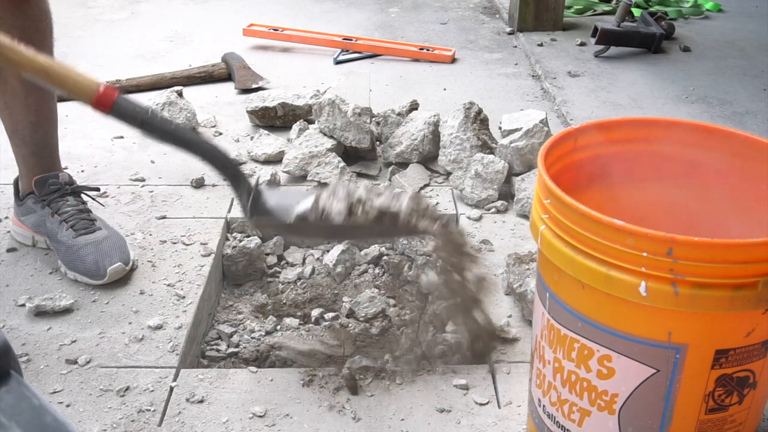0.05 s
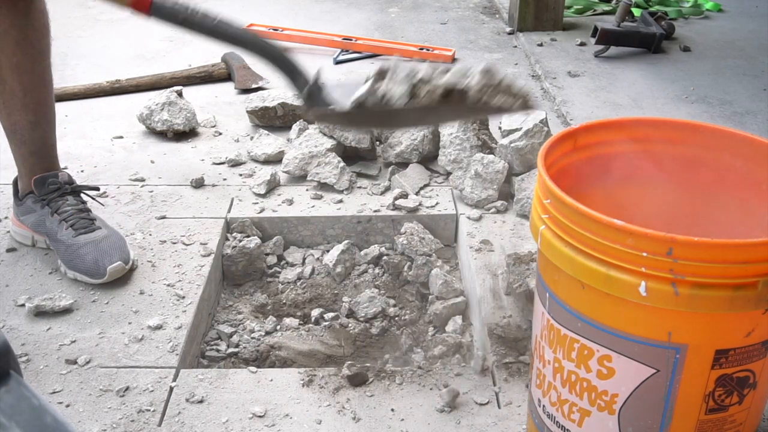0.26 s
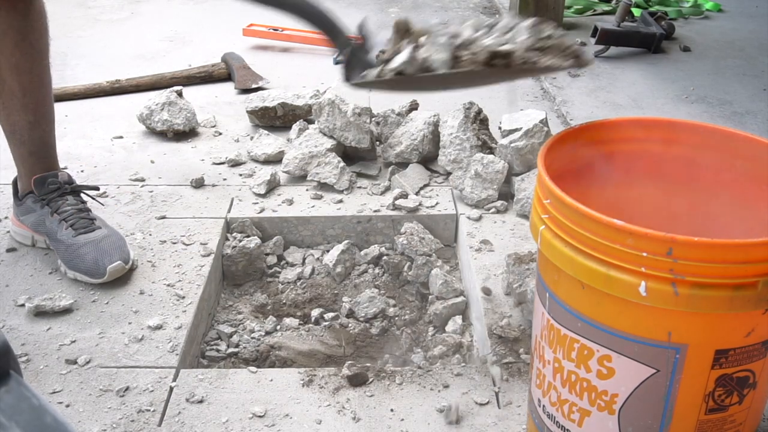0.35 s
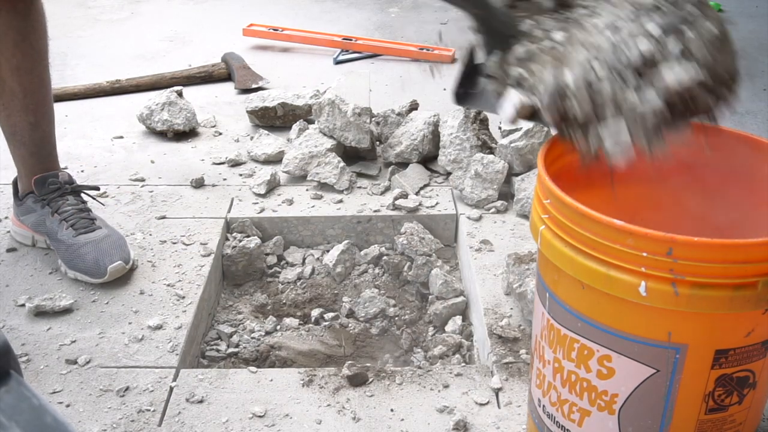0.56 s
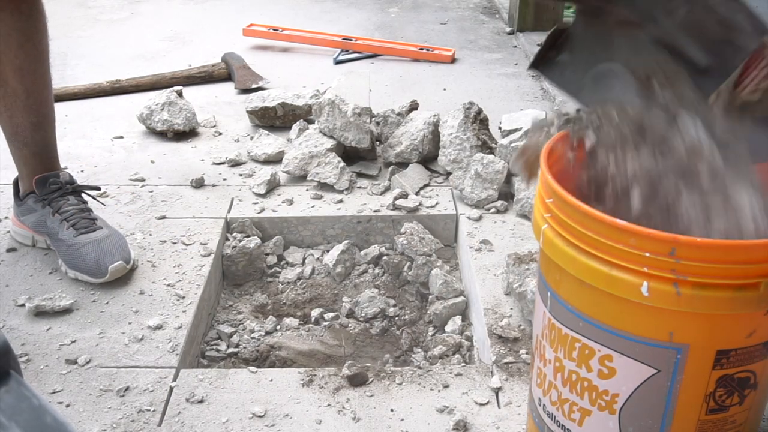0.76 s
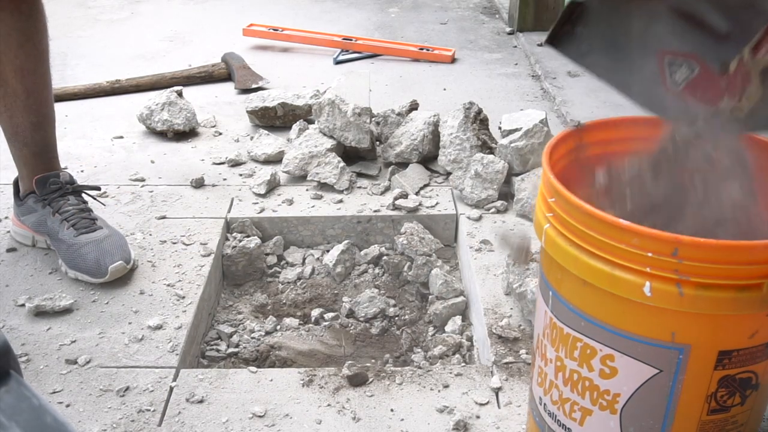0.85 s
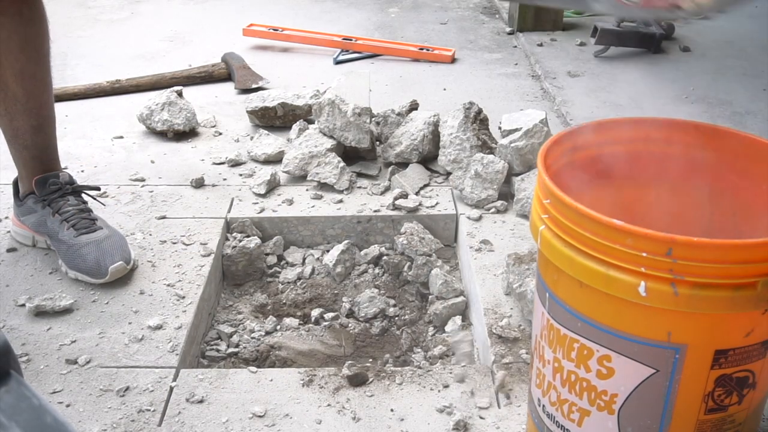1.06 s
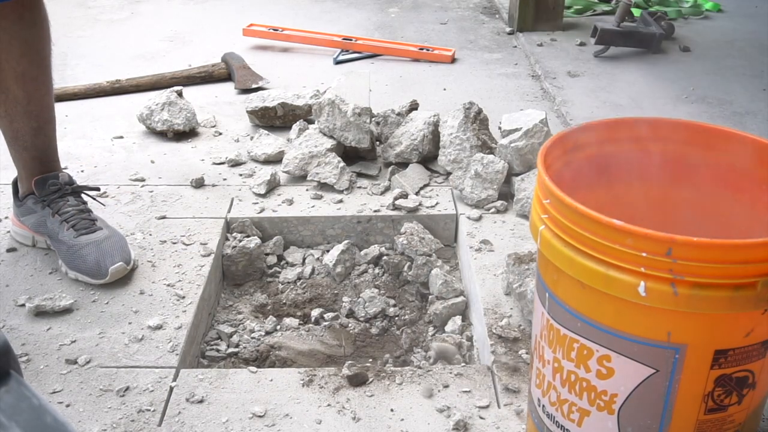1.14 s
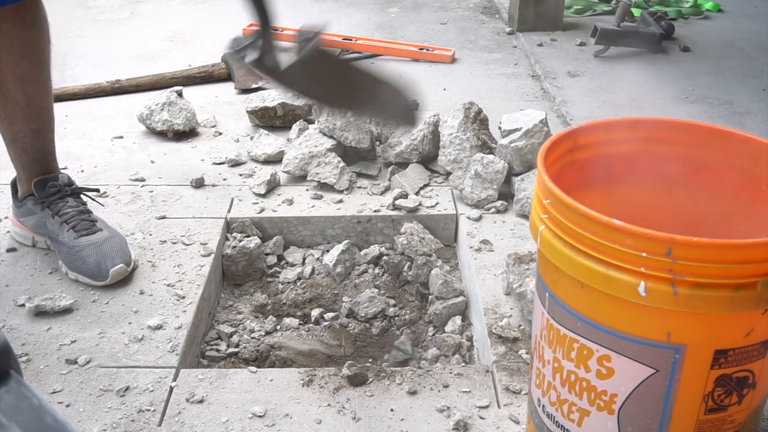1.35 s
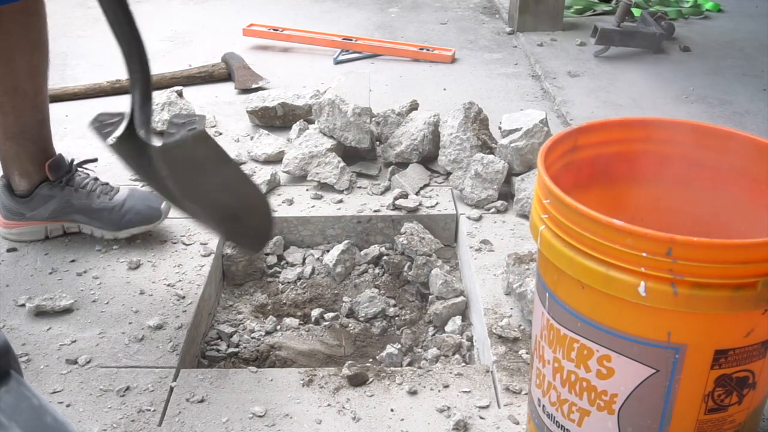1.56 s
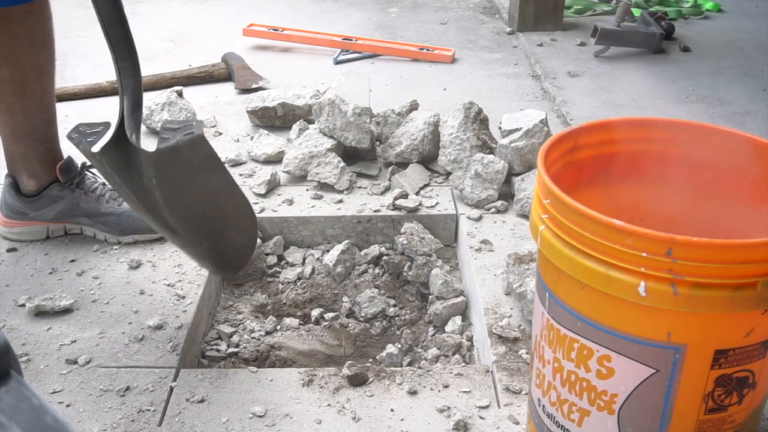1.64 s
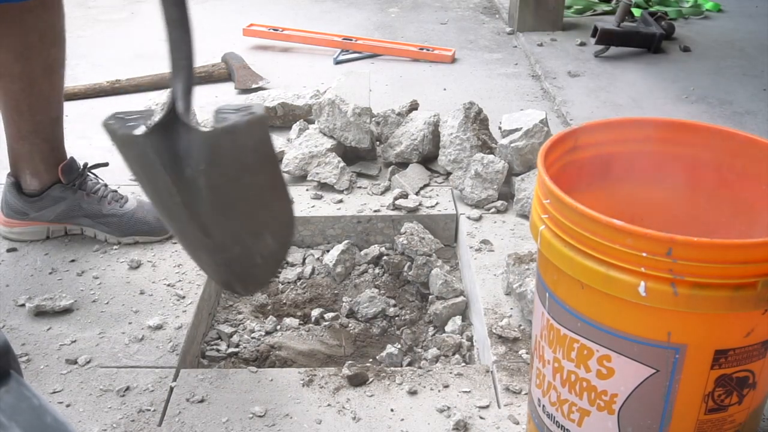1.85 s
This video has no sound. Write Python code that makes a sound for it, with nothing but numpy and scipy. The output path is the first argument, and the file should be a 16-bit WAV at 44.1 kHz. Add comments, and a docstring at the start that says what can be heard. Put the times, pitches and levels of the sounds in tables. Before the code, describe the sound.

Broken concrete is shovelled into a plastic bucket, close by outdoors. Crumbs patter on paving, then lumps thump the bucket floor as gravel rattles off the ringing steel blade. A few stragglers drop and a shoe scuffs over grit.

```python
"""Rubble shovelled into a bucket.

A shovelful of broken concrete is lifted, spilling crumbs on the paving, and tipped into a plastic
bucket. Big lumps thump its floor, gravel and grit pour off the ringing steel blade, and a few
stragglers drop. Then a shoe scuffs over the gritty slabs. A faint low hum lies under the outdoor air."""
import sys
import numpy as np
from scipy import signal
from scipy.fft import rfft, irfft
from scipy.io import wavfile
from scipy.ndimage import uniform_filter1d

SR = 44100
rng = np.random.default_rng(int(sys.argv[2]) if len(sys.argv) > 2 else 0)


def master_out(mix):
    """Clip the mix to full scale and print it as 16-bit PCM to the path in sys.argv[1]."""
    frames = np.transpose(np.atleast_2d(mix))
    ceiling = np.clip(frames, -1, 1)
    pcm = np.round(ceiling * 32767).astype(np.int16)
    wavfile.write(sys.argv[1], SR, pcm)


N = 83790  # 1.9 s


def from_db(db):
    """Decibels to gain."""
    return 10 ** (np.asarray(db) / 20)


def unit_rms(x):
    """Scale to unit power."""
    return x / np.sqrt(np.mean(x ** 2) + 1e-20)


def envelope(points):
    """Gain over time through (t/s, level/dB) points."""
    t_s, db = np.transpose(points)
    return from_db(np.interp(np.arange(N) / SR, t_s, db))


def at_level(x, db, window_s=0.01):
    """Give a short sound the energy of that level held for window_s."""
    return from_db(db) * x * np.sqrt(window_s * SR / np.sum(x ** 2))


def add(out, t_s, x):
    """Mix x in at t_s."""
    start = int(t_s * SR)
    out[start:start + len(x)] += x[:N - start]


def coloured(x, points, size=2048):
    """Minimum-phase filter of unit power, shaped by (f/Hz, level/dB) points."""
    hz, db = np.transpose(points)
    grid_hz = np.maximum(np.arange(size // 2 + 1) * SR / size, 1)
    magnitude = from_db(np.interp(np.log(grid_hz), np.log(hz), db))
    cepstrum = irfft(np.log(magnitude))
    cepstrum[1:size // 2] *= 2
    cepstrum[size // 2 + 1:] = 0
    response = irfft(np.exp(rfft(cepstrum)))
    return signal.fftconvolve(x, response / np.linalg.norm(response))[:len(x)]


def resonance(x, hz, width_hz):
    """Band-pass, unit gain at its centre."""
    r = np.exp(-np.pi * width_hz / SR)
    feedback = [1, -2 * r * np.cos(2 * np.pi * hz / SR), r * r]
    return signal.lfilter(np.array([1, 0, -1]) * (1 - r * r) / 2, feedback, x + 1e-18)


def high_pass(x, hz):
    """Second-order low cut."""
    return signal.sosfilt(signal.butter(2, hz, "high", fs=SR, output="sos"), x)


def contact(t60_s, size=4096):
    """A stone's touch: a spike and a dense, quickly dying ring."""
    evenness = 0.44  # 0 = ragged spectrum, 1 = flat
    decay = from_db(-60 * np.arange(size) / SR / t60_s)
    burst = rng.standard_normal(size) * decay
    burst[0] = 3.6  # spike
    spectrum = rfft(burst)
    return irfft(spectrum / (np.abs(spectrum) + 1e-9) ** evenness) * decay ** 0.25


def grains(rate_hz, spread_db, t60_s, pitched, sizes=16):
    """Random fragment collisions at a steady unit level; each fragment size favours its own pitch."""
    hits = rng.random(N) < rate_hz / SR
    strength = from_db(spread_db * np.minimum(rng.exponential(1, N), 4))
    clicks = hits * strength * rng.choice([-1, 1], N)
    size_class = rng.integers(0, sizes, N)
    out = np.zeros(N)
    for k, hz in enumerate(np.geomspace(500, 12000, sizes)):
        touch = contact(t60_s)
        grain = touch + pitched * resonance(touch, hz, hz / 3)
        out += signal.fftconvolve(clicks * (size_class == k), grain)[:N]
    return out / np.sqrt(uniform_filter1d(out ** 2, size=1800) + 1e-9)


def stones():
    """Each landing stone gives a knock and a brief ring pitched by its size, and a bright crack."""
    # landings: t/s, knock level/dB, knock f/Hz, knock width/oct, crack level/dB, t60/s
    landings = [(0.0259, -31.5, 2840, 1.5, -25.5, 0.012), (0.0605, -37, 2570, 1.7, -26.5, 0.033),
                (.1079, -55, 2500, 2.3, -36, 0.0081), (0.1536, -55, 3040, 1.5, -35, 0.0055),
                (0.2165, -12, 1420, 0.12, -42, 0.039), (0.2175, -14.5, 802, 0.38, -28.5, 0.029),
                (0.2206, -24, 2800, 0.21, -37, 0.007), (0.2392, -38, 2680, 1.1, -24.5, 0.034),
                (.2580, -30, 2280, 1.6, -35, 0.011), (0.31, -36, 1800, 1.8, -41, 0.018),
                (0.3252, -26.5, 3130, 1.2, -27.5, 0.029), (0.3335, -29.5, 970, 1.1, -29.5, 0.043),
                (0.3466, -21, 1133, 0.72, -55, 0.041), (0.4535, -21, 1667, 0.39, -34, 0.052),
                (0.4868, -22.5, 1420, 0.2, -18, 0.044), (0.4867, -23, 2660, 0.15, -21, 0.082),
                (.5405, -39.5, 2840, 2.3, -34, 0.0056), (0.603, -70, 2960, 1.5, -30, 0.012),
                (0.6174, -46, 1660, 0.69, -30, 0.039), (0.6489, -13, 1328, 1.87, -22.5, 0.063),
                (0.6714, -16.5, 1597, 0.5, -49, 0.053), (.6780, -10.5, 577, 0.44, -34, 0.052),
                (.7224, -8.5, 714, 0.49, -22.5, 0.029), (0.7231, -13.5, 1645, 1.5, -44, 0.052),
                (0.7546, -16.5, 1600, 1.9, -28, 0.024), (0.7661, -14, 1335, 0.56, -18.5, 0.071),
                (0.7788, -10.5, 694, 1.7, -22, 0.044), (0.794, -10, 2000, 1.7, -16, 0.091),
                (0.8064, -14, 2180, 0.77, -36, 0.012), (0.8733, -13, 734, 0.18, -24, 0.067),
                (0.9132, -15, 1340, 0.51, -23, .02), (.9250, -9, 1466, 0.87, -23, 0.075),
                (0.9552, -16, 1690, 2.9, -16, 0.037), (.9740, -17, 1320, 0.32, -22, 0.014),
                (1.0281, -10.5, 1220, 0.37, -21.5, 0.038), (1.0533, -10, 915, 1.07, -26, 0.069),
                (1.063, -13, 1430, 0.21, -23.5, 0.0067), (1.0736, -15, 1022, 0.7, -33, 0.08),
                (1.0930, -19.5, 804, 0.31, -44, 0.026), (1.17, -21, 1340, 3, -47, 0.053),
                (1.1775, -11.5, 1256, .8, -25, 0.037), (1.1937, -48, 1300, 1.0, -24, 0.011),
                (1.2334, -24, 2060, 0.84, -42, 0.046), (1.2423, -20, 2220, 1.2, -45, 0.022),
                (1.2510, -30, 2260, 2.2, -29.5, 0.025), (1.2886, -27, 1380, 0.52, -57, 0.025),
                (1.2889, -31, 3380, 0.54, -61, 0.016), (1.3416, -19, 690, 0.18, -72, 0.014),
                (1.3435, -25.5, 1773, 0.56, -63, 0.033), (1.447, -41, 1720, 1.9, -39, 0.017),
                (1.503, -22.5, 1950, 0.76, -50, 0.011), (1.5116, -23, 2340, 0.35, -68, 0.018),
                (1.5366, -17, 1700, 0.44, -36, 0.018), (1.5820, -53, 2500, 1.2, -20, 0.012),
                (1.6105, -30, 1800, 0.83, -28.5, 0.014), (1.6392, -28, 2040, 1.1, -37, 0.016),
                (1.794, -44, 1340, 0.43, -77, 0.028), (1.873, -45, 2150, 1.6, -63, .02)]
    crack_colour = [(100, -46), (400, 2), (1500, 0), (4000, 2.5), (6000, -0.5), (8400, 5), (9400, 1.5),
                    (10500, -14.5), (14000, -12.5), (16000, -14)]  # crack spectrum: f/Hz, level/dB
    knock_trim_db, crack_trim_db = -2, -4
    skirt_oct, rise_db_per_oct, fall_db_per_oct = 4, 16, 21.5
    out = np.zeros(N)
    for t_s, knock_db, hz, width_oct, crack_db, t60_s in landings:
        low_hz, high_hz = hz / 2 ** (width_oct / 2), hz * 2 ** (width_oct / 2)
        band = [(low_hz / 2 ** skirt_oct, -skirt_oct * rise_db_per_oct), (low_hz, 0),
                (high_hz, 0), (high_hz * 2 ** skirt_oct, -skirt_oct * fall_db_per_oct)]
        knock = at_level(coloured(contact(t60_s), band), db=0)
        ring = at_level(stone_ring(hz, 1.26 * t60_s), db=-6.5)
        body = high_pass(knock + ring, 0.65 * low_hz)
        crack = coloured(contact(0.99 * t60_s), crack_colour)
        add(out, t_s, at_level(body, knock_db + knock_trim_db))
        add(out, t_s, at_level(crack, crack_db + crack_trim_db))
    return out


def stone_ring(hz, t60_s, size=4096):
    """A few heavily damped modes, slightly detuned in every fragment."""
    modes = [(0.602, -9), (0.998, -2.5), (1.289, -9.5), (2.08, -10.5)]  # stone modes: ratio to knock pitch, level/dB
    t = np.arange(size) / SR
    tones = sum(from_db(db) * np.sin(2 * np.pi * hz * ratio * rng.normal(1, 0.018) * t)
                for ratio, db in modes)
    return tones * from_db(-60 * t / t60_s)


def thumps():
    """Heavy lumps push on the bucket's floor with a soft pulse."""
    lumps = [(0.6512, -5.5, 400), (.6740, -26, 900), (.6840, -18.5, 1010), (0.7233, -16, 1010),
             (0.9925, -22.5, 704)]  # impacts: t/s, level/dB, contact cut-off f/Hz
    t = np.arange(N // 50) / SR
    force = np.zeros(N)
    for t_s, db, cutoff_hz in lumps:
        push = t * np.exp(-2 * np.pi * cutoff_hz * t)
        add(force, t_s, from_db(db) * push / push.sum())
    return bucket(force)


def bucket(force):
    """A force drives the bucket's modes; its wall radiates as it moves."""
    modes = [(60, -23, 0.14), (115, -15, 0.072), (202, -0.5, 0.077), (215.6, 0, 0.078), (426, -1.5, .12),
             (550, -38, 0.076), (647, -22, 0.097), (850, 8.5, 0.07), (1290, -22, .04), (1500, -4, 0.054)]  # floor and wall modes: f/Hz, level/dB, t60/s
    max_cycles = 80
    out = np.zeros(N)
    for hz, db, t60_s in modes:
        ring_s = min(t60_s, max_cycles / hz)
        r = from_db(-60 / (ring_s * SR))
        feedback = [1, -2 * r * np.cos(2 * np.pi * hz / SR), r * r]
        out += from_db(db) * signal.lfilter([0.5, 0, -0.5], feedback, force + 1e-18)
    return out


def pour():
    """Gravel and grit clatter off the blade and drum on the plastic, cushioned by the heap."""
    # gravel flow, grit flow, drumming on the floor: t/s, level/dB
    gravel_flow = [(.6, -47), (.625, -34.5), (.66, -21.5), (.69, -23), (.71, -21.5), (.748, -28),
                   (.775, -14), (.81, -15.5), (.89, -15.5), (.94, -17.5), (1.01, -14), (1.05, -20),
                   (1.09, -19.5), (1.11, -32), (1.155, -28.5), (1.19, -33), (1.23, -34.5), (1.31, -48),
                   (1.43, -48), (1.46, -77)]
    grit_flow = [(.6, -60), (.625, -38), (.68, -27.5), (.745, -28.5), (.79, -22.5), (.86, -20.5),
                 (.895, -24.5), (.96, -22.5), (1.02, -27), (1.09, -51), (1.12, -45), (1.2, -42),
                 (1.26, -58), (1.32, -65), (1.43, -50), (1.46, -86)]
    drumming = [(.64, -75), (.69, -50), (.78, -30), (.835, -23), (.9, -28.5), (.95, -35), (.99, -29.5),
                (1.05, -33), (1.12, -65), (1.3, -78)]
    # spectra: f/Hz, level/dB
    gravel_colour = [(40, -33), (100, -33), (250, -5.5), (450, -5.5), (700, 2.5), (1000, -4), (1350, 2.5),
                     (1800, -5.5), (2200, -10), (2750, -11.5), (3480, -7.5), (3750, -20.5), (4200, -12),
                     (5500, -24.5), (9000, -21), (16000, -67)]
    grit_colour = [(500, -28), (2500, 9), (4500, -2), (5500, -1), (7000, -4.5), (8600, 1.5), (9400, -9),
                   (10300, -11.5), (12000, -11), (14000, -7), (16000, -21)]
    cushion_hz, low_cut_hz = 450, 140
    gravel = grains(rate_hz=1000, spread_db=3.5, t60_s=0.024, pitched=3.4)
    grit = grains(rate_hz=1800, spread_db=3.5, t60_s=0.0073, pitched=0.71)
    blows = grains(rate_hz=1200, spread_db=1.0, t60_s=0.001, pitched=0.2)
    cushioned = signal.sosfilt(signal.butter(1, cushion_hz, fs=SR, output="sos"), blows)
    drum = bucket(high_pass(cushioned, low_cut_hz))
    return (envelope(gravel_flow) * unit_rms(coloured(gravel, gravel_colour))
            + envelope(grit_flow) * unit_rms(coloured(grit, grit_colour))
            + envelope(drumming) * unit_rms(drum))


def blade():
    """Rubble shifting and sliding on the shovel rings its loaded steel blade."""
    modes = [(798, 27, 4), (1446, 120, 1.5), (1920, 96, -1), (2550, 130, -2.5), (2790, 140, 3),
             (3130, 170, -4.5), (3507, 94, 0.5), (4120, 110, -6)]  # damped blade modes: f/Hz, width/Hz, level/dB
    rattle = [(0, -51), (.2, -72), (.26, -49), (.42, -39.5), (.55, -49), (.6, -68), (.63, -39),
              (.74, -37.5), (.795, -18), (.86, -16.5), (.9, -22.5), (.98, -24), (1.05, -27), (1.12, -57),
              (1.25, -60), (1.45, -71)]  # rubble on the blade: t/s, level/dB
    taps = grains(rate_hz=1200, spread_db=2.5, t60_s=0.0041, pitched=0.45)
    ring = sum((-1) ** k * from_db(db) * resonance(taps, hz, width_hz)
               for k, (hz, width_hz, db) in enumerate(modes))
    return envelope(rattle) * unit_rms(ring)


def scuff():
    """Grit crunches and rolls under a sliding sole."""
    slide = [(1.43, -77), (1.452, -34.5), (1.495, -29), (1.51, -24.5), (1.545, -21), (1.58, -21.5),
             (1.6, -28.5), (1.617, -23), (1.655, -37.5), (1.7, -39), (1.76, -55), (1.9, -50.5)]  # shoe stroke: t/s, level/dB
    colour = [(100, -9), (250, -8), (460, 1), (850, -2.5), (1400, 2), (2000, 1.5), (2400, -4.5),
              (3000, -1.5), (4500, -9.5), (7800, -13.5), (9100, -13.5), (11000, -24), (14000, -24.5),
              (16000, -33)]  # crunch spectrum: f/Hz, level/dB
    crunch = grains(rate_hz=2800, spread_db=3.0, t60_s=0.0049, pitched=2.9)
    return envelope(slide) * unit_rms(coloured(crunch, colour))


def spill():
    """Crumbs patter and sand sizzles on the paving while the shovel rises."""
    flow = [(0, -54), (.09, -43), (.17, -39), (.2, -42), (.24, -38.5), (.3, -36), (.34, -30), (.365, -39),
            (.41, -30.5), (.45, -43), (.52, -40.5), (.56, -45), (.6, -40), (.66, -49)]  # spill off the blade: t/s, level/dB
    # spectra: f/Hz, level/dB
    crumb_colour = [(100, 5.5), (400, 4.5), (800, 6), (1400, -3.5), (2200, -4.5), (4000, -4.5), (6500, -7),
                    (8700, -1.5), (10500, -14), (14000, -11), (16000, -34)]
    sand_colour = [(1500, -46), (4500, 9), (8600, 0), (10300, -11), (14000, 2), (16000, -2)]
    sand_db = -21  # re crumbs
    crumbs = grains(rate_hz=1500, spread_db=5.5, t60_s=0.021, pitched=2.1)
    sand = grains(rate_hz=2500, spread_db=4.5, t60_s=0.0022, pitched=0.8)
    patter = unit_rms(coloured(crumbs, crumb_colour))
    sizzle = unit_rms(coloured(sand, sand_colour))
    return envelope(flow) * (patter + from_db(sand_db) * sizzle)


def chips():
    """The smallest splinters give only a thin, high tick on hard surfaces."""
    ticks = [(.1539, -42.5), (.2401, -35), (0.3357, -36), (.4320, -35.5), (.6176, -34), (0.9917, -30),
             (1.0910, -34.5), (1.0981, -36), (1.2434, -40), (1.4030, -51), (1.5550, -28.5), (1.5822, -50)]  # chip landings: t/s, level/dB
    colour = [(200, -45), (1000, -31), (4000, 0), (7000, 3.5), (9200, 8), (10800, -2.5), (14000, 2),
              (16000, -4)]  # tick spectrum: f/Hz, level/dB
    out = np.zeros(N)
    for t_s, db in ticks:
        tick = coloured(contact(t60_s=0.012), colour)
        add(out, t_s, at_level(tick, db))
    return out


def yard(x):
    """Weak scattered reflections from the paving and nearby walls."""
    colour = [(100, -12), (1000, -8), (3000, -10), (9000, -8.5), (16000, -12)]  # reflection spectrum: f/Hz, level/dB
    t60_s, delay_s, gain_db = 0.21, 0.0061, -16.52
    t = np.arange(N // 4) / SR
    tail = rng.standard_normal(len(t)) * from_db(-60 * t / t60_s) * (t > delay_s)
    reflections = signal.fftconvolve(x, tail / np.linalg.norm(tail))[:N]
    return from_db(gain_db) * coloured(reflections, colour)


def background():
    """Outdoor air with a faint low hum that wavers in pitch."""
    air_colour = [(20, -24), (35, 3), (60, 10), (120, -6), (200, 8), (400, 2), (900, -5), (2000, -39),
                  (4500, -21.5), (9000, -40.5), (11000, -71), (16000, -24)]  # air spectrum: f/Hz, level/dB
    air_db, hum_db = -46.5, -45
    hum_hz, width_hz, levelling_s = 106, 10, 0.08
    air = unit_rms(coloured(rng.standard_normal(2 * N), air_colour)[N:])  # first half: filter settles
    band = resonance(rng.standard_normal(2 * N), hum_hz, width_hz)
    hum = resonance(band, hum_hz, width_hz)[N:]
    hum /= np.sqrt(uniform_filter1d(hum ** 2, size=int(levelling_s * SR)))
    return from_db(air_db) * air + from_db(hum_db) * hum


def scene():
    """Rubble and shoe, their reflections and the background; mono."""
    near = stones() + chips() + thumps() + pour() + blade() + spill() + scuff()
    return (near + yard(near) + background())[None]


def record(dry):
    """Soft peak limiting, then a steep treble cut."""
    cutoff_hz = 15750
    limited = dry / (1 + dry ** 6) ** (1 / 6)
    return signal.sosfilt(signal.ellip(10, 0.2, 90, cutoff_hz, fs=SR, output="sos"), limited)


dry = scene()
out = record(dry)
master_out(out)
```